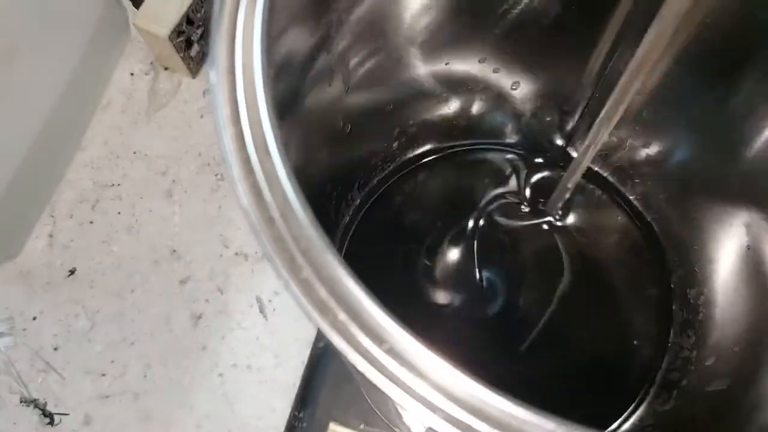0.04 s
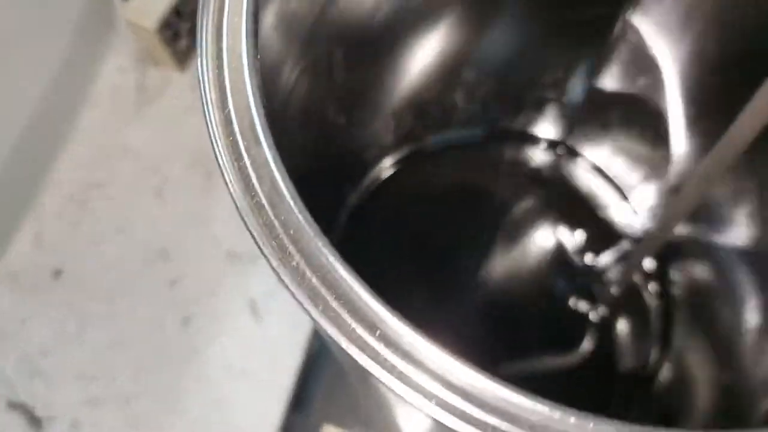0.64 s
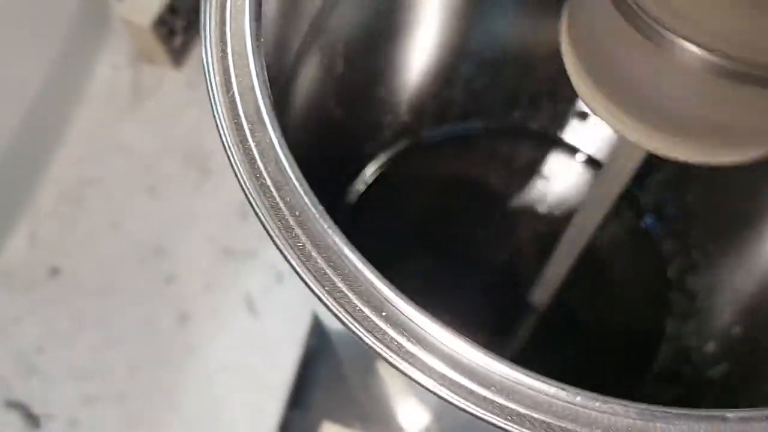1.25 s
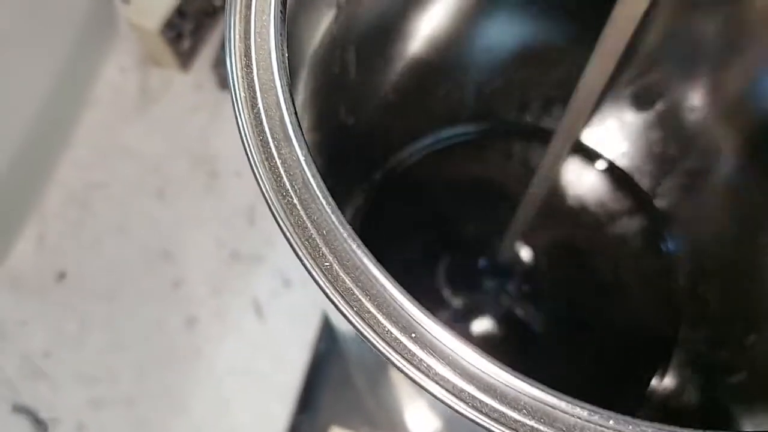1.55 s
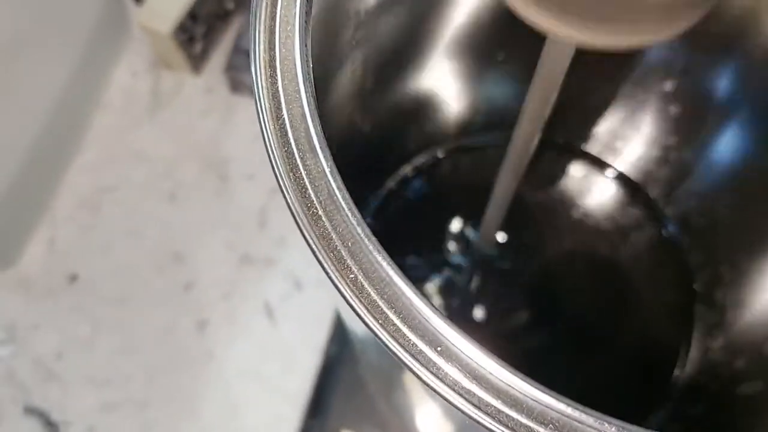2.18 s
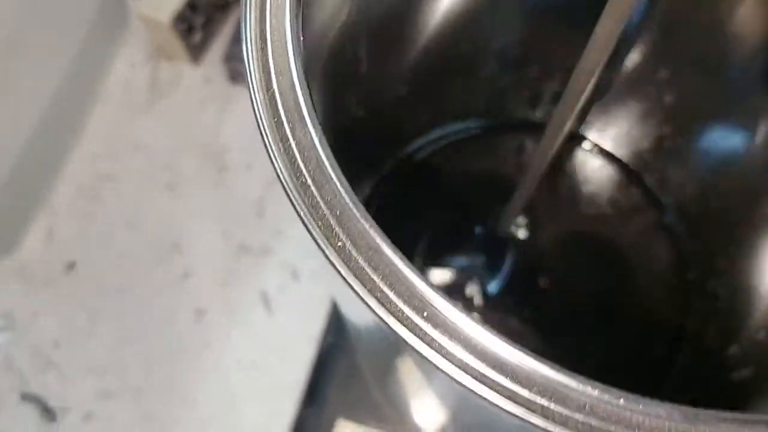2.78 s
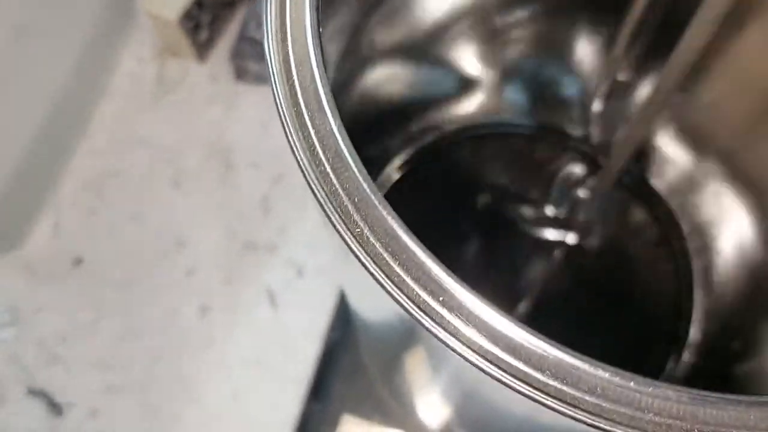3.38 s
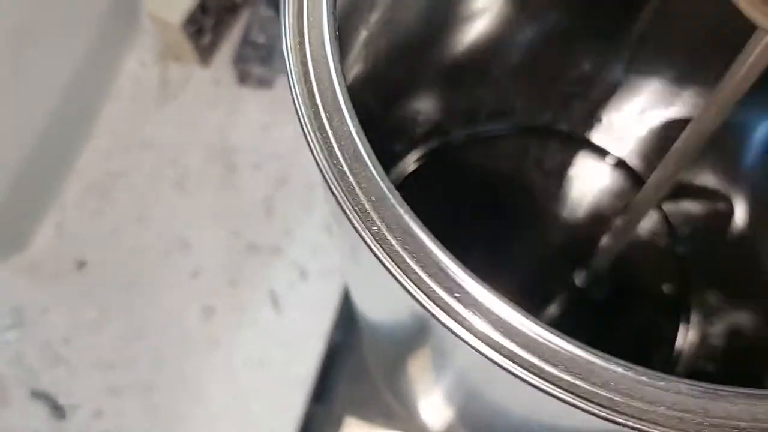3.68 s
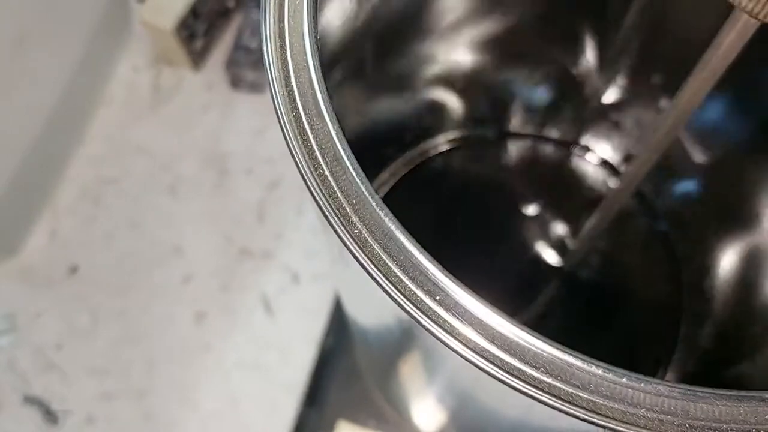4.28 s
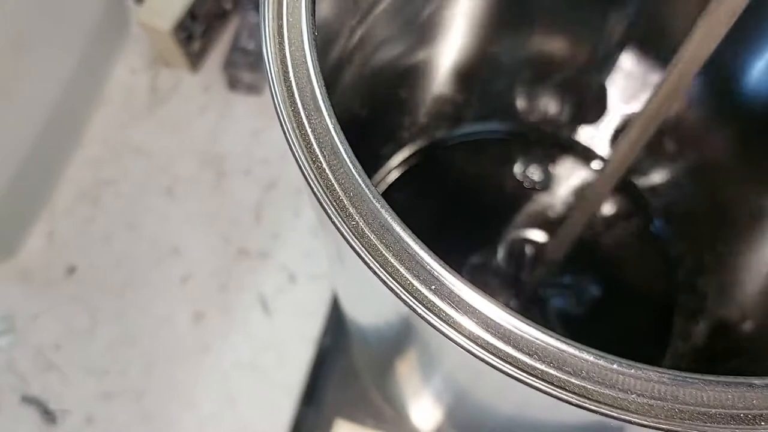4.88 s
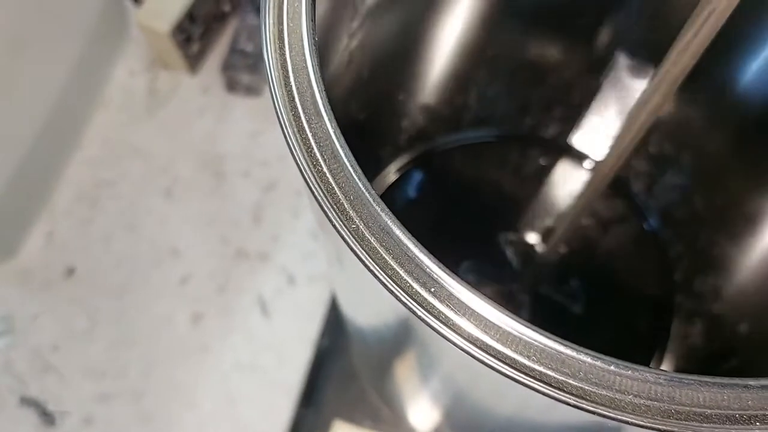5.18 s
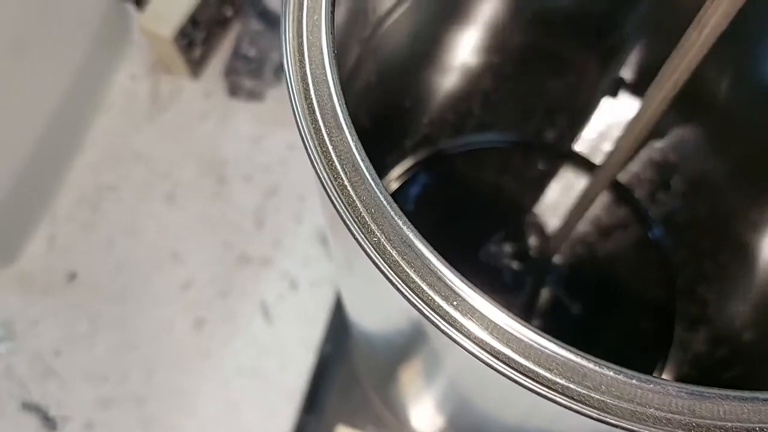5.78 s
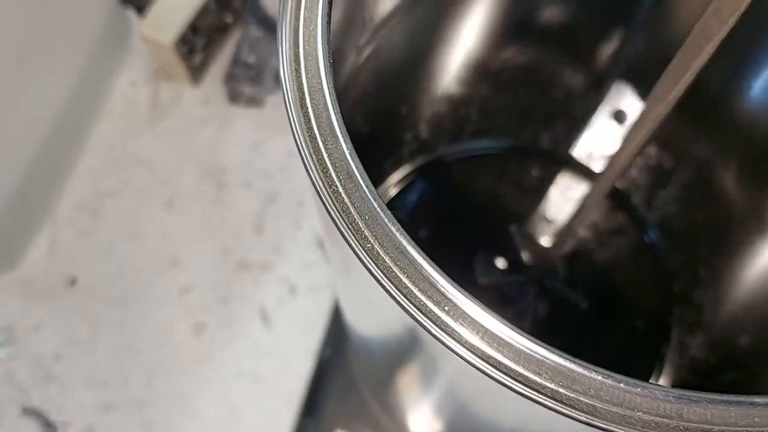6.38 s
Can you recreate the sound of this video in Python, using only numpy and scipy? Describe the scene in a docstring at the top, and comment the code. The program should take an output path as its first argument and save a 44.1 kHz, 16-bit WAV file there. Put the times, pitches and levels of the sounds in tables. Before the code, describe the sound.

An electric mixer whirs loudly in a steel pot of liquid, stops with a clack, then turns over with a faint whir.

```python
"""In a workshop, a fast electric motor drives a mixer shaft in a steel pot of churning liquid.
Its off-balance spin makes a drone, its gears rattle and whine, and its cooling air hisses.
It brakes and stops with a clack. Then the drive turns over slowly: the bearings whir, the gears
tick and the switching of the current whistles faintly. Under it all the room hums and throbs."""
import sys
import numpy as np
from scipy import signal
from scipy.fft import rfft, irfft, next_fast_len
from scipy.io import wavfile

SR = 44100
rng = np.random.default_rng(int(sys.argv[2]) if len(sys.argv) > 2 else 0)


def dump(signal):
    """Clip the signal to [-1, 1] and save it as 16-bit WAV at the path in sys.argv[1]."""
    limited = np.clip(np.atleast_2d(signal).T, -1, 1)
    pcm = np.round(limited * 32767).astype(np.int16)
    wavfile.write(sys.argv[1], SR, pcm)


N = 284445
TIME = np.arange(N) / SR
BRAKE_S = 3.98   # when the motor starts to brake

# motor speed, sagging a little under load: time_s, turns_per_s
SPEED = [(0.1, 311.6), (0.48, 309.7), (1.5, 310.8), (2.4, 311.3), (3.72, 309.7), (3.82, 307.8),
         (3.95, 309.9)]
# main whines, which swell as the tool is moved; for each multiple of the speed: time_s, level_db
WHINES = { 9: [(0.4, -34.5), (1.3, -46), (1.8, -37), (2.4, -43), (3.0, -35)], 24: [(0.45, -43),
          (0.65, -37.5), (1.25, -49), (1.55, -39), (3.3, -45)], 27: [(0.5, -36), (0.9, -45), (1.4, -43.5),
          (1.65, -37)], 29: [(0.9, -44), (1.4, -40), (1.85, -51), (2.35, -36), (3.28, -38), (3.7, -46)],
          38: [(1.05, -48), (1.45, -37.5), (2.7, -39.5), (3.4, -47)], 42: [(1.0, -44), (1.65, -39),
          (1.9, -48), (2.2, -34.5), (3.2, -45), (3.55, -34.5), (3.8, -43)], 48: [(0.3, -37), (1.6, -45),
          (2.03, -33.5), (2.5, -46), (2.9, -35.5)], }
# how much louder the left side is than the right: pitch_hz, difference_db
BALANCE = [(400, 1.4), (750, -3.5), (1070, -4.5), (1400, 3.5), (2350, 4), (3000, 0), (4500, 5.5), (5800, 0),
           (14500, 1.2)]


def motor():
    """One spinning shaft sets the timing of the drone, the gears and the fan until it stops."""
    # hiss of the cooling air, rising and falling as the tool is moved: time_s, relative_db
    fan = [(0.1, -30.5), (0.24, -27), (0.48, -30), (0.7, -30), (1.03, -31), (1.22, -28), (1.79, -30),
           (1.89, -33), (1.97, -28.5), (3.02, -28.5), (3.09, -33), (3.17, -29)]
    air_db = in_time(fan)
    braking_s = np.maximum(TIME - BRAKE_S, 0)
    speed = in_time(SPEED) * np.exp(-.85 * braking_s) * (1 + .00022 * drift(15))
    turns = np.cumsum(speed) / SR
    body = drone_and_pot(turns) + gear_rattle(turns, braking_s)
    air = cooling_air(turns) * from_db(air_db - 22 * braking_s)
    load = from_db(-150 * braking_s)   # the whines fade as soon as the load comes off
    whines = (gear_whines(turns, air_db) + vent_whistles()) * load
    running = from_db(-60 * np.maximum(TIME - 4.187, 0) / .08)   # at the stop: 60 dB down in 0.08 s
    return (body + air + whines) * running


def drone_and_pot(turns):
    """The off-balance shaft drones and shakes the pot, whose air booms while the liquid sloshes."""
    # drone, swelling as the shaft is moved about the pot: time_s, relative_db
    swells = [(0.0, -36.5), (0.13, -27.5), (0.17, -32), (0.24, -25), (0.35, -25), (0.41, -32.5),
              (0.58, -30), (0.87, -25), (1.0, -22.5), (1.1, -33), (1.2, -24.5), (1.33, -24), (1.53, -44),
              (1.6, -34), (1.95, -40), (2.0, -28), (2.28, -36), (2.45, -29.5), (2.77, -44), (2.83, -34),
              (3.19, -39), (3.23, -25.5), (3.85, -33), (3.89, -44), (3.96, -35), (4.16, -51)]
    # liquid churning in the pot: time_s, level_db
    churning = [(.45, -50), (.65, -36), (1.05, -38.5), (1.25, -47), (2.15, -56), (2.6, -45), (3.8, -46)]
    # boom of the air in the pot, just below the drone: pitch_hz, relative_db
    pot_spectrum = [(200, -32), (250, -10), (300, 8.5), (330, -17), (370, -9), (600, -27)]
    swell_db = in_time(swells)
    churn = from_db(in_time(churning))
    wobble = .7 * churn / churn.max() * drift(16)   # heavy churning shakes the drone
    level = from_db(swell_db - 1.2 + 1.5 * drift(13))
    drone = np.sqrt(2) * np.sin(2 * np.pi * turns + wobble) * level * panned(2)
    boom = noise(pot_spectrum) * from_db(-39.5 + .34 * (swell_db - np.mean(swell_db)))
    slosh = noise([(45, -8.5), (200, -9), (400, -2.5), (700, -23)]) * churn
    return drone + boom + slosh


def gear_rattle(turns, braking_s):
    """The gears rattle, and the shaft chatters unevenly about once in ten turns."""
    # rattle of the gears: pitch_hz, relative_db
    rattle_spectrum = [(200, -35), (340, -13), (600, -8), (920, -6.5), (1100, -1.5), (1400, -8.5),
                       (1850, -4), (2300, -3.5), (2570, -10), (2950, -3), (4700, -6), (6200, -16.5),
                       (8000, -42)]
    # chatter of the shaft: pitch_hz, relative_db
    chatter_spectrum = [(1400, -35), (1650, -0.5), (1920, -2), (2350, -45)]
    rub_db = 1.2 * np.cos(2 * np.pi * turns / 10 + 1.5 * drift(2.9))
    rattle = noise(rattle_spectrum, grain_db=4)
    chatter = noise(chatter_spectrum) * from_db(rub_db - 5.5)
    fall_db_per_s = 1
    return (rattle + chatter) * from_db(-26 - fall_db_per_s * braking_s + .85 * drift(19))


def cooling_air(turns):
    """The fan chops its hissing air once, twice and three times in each turn."""
    # main hiss of the air: pitch_hz, relative_db
    hiss_spectrum = [(3500, -13), (5900, 6), (7000, -0.5), (7800, 1), (9200, 2.5), (10300, -1),
                     (11200, -24)]
    # highest part of the hiss: pitch_hz, relative_db
    top_spectrum = [(9800, -9.5), (11000, -4), (12200, -1.5), (13500, -3), (14900, -2), (15500, -12.5)]
    chop = 1 + sum(depth * np.cos(2 * np.pi * k * turns) for k, depth in [(1, .05), (2, .06), (3, .12)])
    hiss = noise(hiss_spectrum) * from_db(-2 + 1.3 * drift(33))
    top = noise(top_spectrum) * from_db(-1 + 1.3 * drift(21))
    return (hiss + top) * chop


def gear_whines(turns, air_db):
    """Motor and gears whine at multiples of the turning speed."""
    # lesser tones of motor and gears: speed_multiple, relative_db
    lesser_tones = [(2.5, -49.5), (3, -38), (6, -41), (12, -45), (15, -43), (30, -42.5), (36, -45),
                    (40, -42), (44, -46), (45, -40), (47, -43.5)]
    follow_db = air_db - np.mean(air_db) - .5   # they rise and fall with the hiss
    tones = []
    for multiple, db in lesser_tones:
        swell_db = 2.5 * np.sqrt(multiple / max(WHINES)) * drift(1.7)   # high tones swell more
        tones.append((multiple, db + follow_db + swell_db))
    tones += [(multiple, in_time(rows)) for multiple, rows in WHINES.items()]
    play_turns = .0014 * (1 + 2 * (TIME > BRAKE_S))   # gears are looser without a load
    angle = turns + play_turns * drift(60)   # this looseness blurs the highest tones
    out = np.zeros((2, N))
    for multiple, db in tones:
        level = from_db(db + 1.8 * drift(20)) * panned(at_hz(BALANCE, multiple * SPEED[0][1]))
        stir = .005 * multiple * drift(2)   # shifting echoes off the pot
        spread = .21 * (multiple in (3, 9))   # these two swing almost opposite ways left and right
        phase = multiple * angle + rng.random() + (stir + spread) * [[1], [-1]]
        out += level * np.sin(2 * np.pi * phase)
    return np.sqrt(2) * out


def vent_whistles():
    """A narrow band of rushing air swells along with each of three high whines."""
    half_width_hz = 1300
    out = 0
    for multiple in (29, 38, 42):
        hz = multiple * SPEED[0][1]
        band = [(hz - half_width_hz, -20), (hz, 0), (hz + half_width_hz, -20)]
        out += noise(band) * from_db(in_time(WHINES[multiple]) + 1.5)
    return out


def brake_clack():
    """The brake bites in a quick rush of contacts that jolts the housing; the room echoes briefly."""
    # clack of the brake: pitch_hz, relative_db
    spectrum = [(200, -9.5), (600, -2), (900, -9), (2100, -8), (2700, -8), (3500, -1.5), (4800, -5),
                (6200, -13), (15000, -21)]
    peak_s, housing_hz = 4.1805, 690
    t = TIME - peak_s
    bite = noise(spectrum, grain_db=2) * burst(t, swell_s=.003, fade_s=.02)
    echo = noise(spectrum) * burst(t, swell_s=.002, fade_s=.085)
    ring = np.sin(2 * np.pi * housing_hz * t + [[0], [np.pi / 2]]) * panned(-3)
    housing = ring * burst(t, swell_s=.004, fade_s=.025)
    return from_db(-9.5) * bite + from_db(-19) * echo + from_db(-9) * housing


def knocks():
    """The shaft, the liquid and the brake give short, quickly fading knocks."""
    # the knocks: peak_s, level_db, fade_s, pitch_hz
    hits = [(3.209, -21, 0.046, 600), (3.528, -18.5, .05, 2750), (3.99, -20, 0.03, 1920)]
    return sum(knock(*hit) for hit in hits)


def slow_drive():
    """In slow turning the bearings whir, and the drive whistles as it switches the current."""
    # how fast the drive's magnetic field turns: time_s, rate_hz
    field_rates = [(5.365, 51), (5.405, 151.5), (5.6, 159.3), (5.86, 156), (6.0, 110.7), (6.22, 53.3)]
    # whir of the bearings: pitch_hz, relative_db
    whir_spectrum = [(250, 2), (900, 0), (1080, 6), (1350, -9), (1900, 1), (2400, -11.5), (3300, -5),
                     (4600, -10), (5200, -15.5), (5800, -12.5), (7000, -17.5), (15500, -21)]
    # whistle tones, in steps of the field's rate from the switching pitch: steps, relative_db
    whistle_tones = [(-1, -64), (0, -64.5), (1, -72)]
    start_s, faded_in_s, switch_hz = 5.06, 5.31, 9980
    field_hz = in_time(field_rates)
    field_turns = np.cumsum(field_hz) / SR
    speed = field_hz / field_hz.max()
    whir_db = -37.5 - 23 * np.maximum(faded_in_s - TIME, 0)
    whir = hollow(hollow(noise(whir_spectrum, grain_db=6)))
    whir *= speed ** .67 * from_db(whir_db + drift(27))
    whistle = 0
    for steps, db in whistle_tones:
        growth = speed ** (.5 + max(steps, 0))   # the top tone grows most with speed
        level = from_db(db + 6.5 + 1.5 * drift(12)) * growth
        phase = switch_hz * TIME + steps * field_turns + rng.random() + np.array([[0], [.2]])
        whistle += np.sqrt(2) * level * np.sin(2 * np.pi * phase)
    sizzle = from_db(-68) * noise([(8500, -26), (9900, 12), (10800, -30)])
    # near top speed a gear sings at seven times the field's rate
    sing_level = speed ** 2 * from_db(-54 + 2 * drift(15))
    sing = sing_level * np.sin(2 * np.pi * 7 * field_turns + .7 * drift(25))
    switched_on = np.clip((TIME - start_s) / .013, 0, 1)
    return (whir + whistle + sizzle + sing) * switched_on


def gear_ticks():
    """Slowly turning gears tick as the small gaps between their teeth close."""
    # the ticks: peak_s, level_db
    ticks = [(5.057, -49), (5.077, -41), (5.1, -43.5), (5.399, -42), (6.14, -40.5)]
    return sum(knock(peak_s, db, fade_s=.035, pitch_hz=3400) for peak_s, db in ticks)


def workshop():
    """The mains power hums over a soft hiss, and a low boom throbs and now and then swells."""
    # mains hum: pitch_hz, level_db
    hum_tones = [(100, -56), (200, -47.5), (600, -60.5)]
    # steady noise of the room: pitch_hz, relative_db
    room_spectrum = [(45, -14), (340, -13.5), (430, -8), (700, -15.5), (1350, -20.5), (1900, -18.5),
                     (2600, -22.5), (4500, -30), (7000, -39.5), (15500, -40.5)]
    # low boom of the room: pitch_hz, relative_db
    boom_spectrum = [(150, -28.5), (188, -9), (220, -32), (242, -5.5), (268, -7), (300, -17), (350, -32)]
    # strongest swells of the boom: peak_s, level_db
    boom_swells = [(4.82, -39), (5.05, -38), (5.52, -39), (6.03, -34.5)]
    throb_hz, swell_hz, swell_s = 8.7, 256.3, .027
    hum = 0
    for hz, db in hum_tones:
        hum += np.sqrt(2) * from_db(db + drift(2)) * np.sin(2 * np.pi * (hz * TIME + rng.random()))
    throb_db = 3 * np.cos(2 * np.pi * throb_hz * TIME + 2 * drift(2.2))
    boom = noise(boom_spectrum) * from_db(-41 + throb_db)
    swells = sum(from_db(db) * np.exp(-((TIME - at) / swell_s) ** 2) for at, db in boom_swells)
    boom += swells * np.sqrt(2) * np.sin(2 * np.pi * swell_hz * TIME + drift(12))
    return hum * panned(4.2) + from_db(-44) * noise(room_spectrum) + boom


def knock(peak_s, level_db, fade_s, pitch_hz):
    """One knock: a burst of noise about an octave wide."""
    band = signal.butter(2, [pitch_hz / np.sqrt(2), pitch_hz * np.sqrt(2)], "band", fs=SR, output="sos")
    rush = unit_level(signal.sosfilt(band, rng.standard_normal((2, N))))
    return rush * from_db(level_db) * burst(TIME - peak_s, swell_s=.002, fade_s=fade_s)


def hollow(x):
    """Three quick, dull echoes give a hollow ring."""
    spacing_hz, strength, dull_hz = 124.7, .22, 1500
    lag = int(SR / spacing_hz)
    dull = signal.lfilter(*signal.butter(1, dull_hz, fs=SR), x)
    echoes = sum(strength ** k * np.pad(dull, ((0, 0), (k * lag, 0)))[:, :N] for k in range(1, 4))
    return unit_level(x + echoes)


def noise(spectrum, grain_db=0):
    """Stereo noise shaped by rows of pitch_hz, relative_db; grain_db makes it gritty."""
    # how alike left and right are: pitch_hz, likeness (1 the same, -1 opposite)
    likeness = [(120, 0.64), (280, 0.9), (450, 0.4), (740, -0.03), (1250, -0.5), (2000, 0.46),
                (3300, -0.16), (12000, 0.04)]
    size = next_fast_len(N)
    hz = np.maximum(np.arange(size // 2 + 1) * SR / size, 1)
    mid, side = rfft(rng.standard_normal((2, size)) * from_db(grain_db * rng.standard_normal(size)))
    alike = at_hz(likeness, hz)
    pair = np.sqrt(1 + alike) * mid + np.sqrt(1 - alike) * side * [[1], [-1]]
    roll_off = 1 / (1 + (spectrum[0][0] / hz / 2) ** 4) / (1 + (hz / spectrum[-1][0] / 2) ** 4)
    gain = panned(at_hz(BALANCE, hz)) * roll_off * from_db(at_hz(spectrum, hz))
    return unit_level(irfft(pair * gain, size)[:, :N])


def drift(rate_hz):
    """A smooth random wander, about 1 in size."""
    step, warm_up = 40, 2000
    r = np.exp(-2 * np.pi * step * rate_hz / SR)
    white = rng.standard_normal(N // step + warm_up + 2)
    slow = signal.lfilter([1], [1, -2 * r, r * r], white)[warm_up:]
    return np.interp(np.arange(N) / step, np.arange(len(slow)), unit_level(slow))


def burst(t, swell_s, fade_s):
    """A level that swells up to time zero, then drops 60 dB in fade_s."""
    return np.exp(np.minimum(t, 0) / swell_s) * from_db(-60 * np.maximum(t, 0) / fade_s)


def in_time(rows):
    """Join rows of time_s, value into one value per sample."""
    return np.interp(TIME, *np.transpose(rows))


def at_hz(rows, hz):
    """Read rows of pitch_hz, value at any pitch, with octaves evenly spaced."""
    pitches, values = np.transpose(rows)
    return np.interp(np.log(hz), np.log(pitches), values)


def panned(db):
    """Left and right gains, the left louder by db."""
    return from_db(np.array([[.5], [-.5]]) * db)


def from_db(db):
    """Turn decibels into a gain."""
    return 10 ** (np.asarray(db) / 20)


def unit_level(x):
    """Scale a signal to an average power of 1."""
    return x / np.sqrt(np.mean(x ** 2) + 1e-20)


def scene():
    """The mixer runs, stops and turns slowly, over the sound of the room."""
    return brake_clack() + gear_ticks() + motor() + knocks() + slow_drive() + workshop()


def record(dry):
    """Round off the highest peaks, then cut the deep bass and the very top."""
    low_cut = signal.butter(4, 42, "high", fs=SR, output="sos")
    top_cut = signal.ellip(10, .1, 80, 15600, fs=SR, output="sos")
    return signal.sosfilt(top_cut, signal.sosfilt(low_cut, np.tanh(dry)))


dry = scene()
out = record(dry)
dump(out)
```